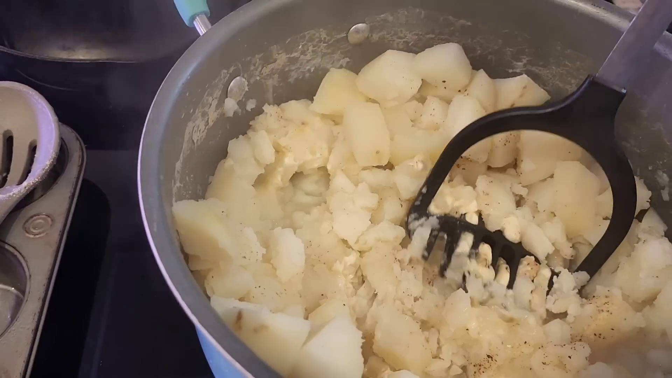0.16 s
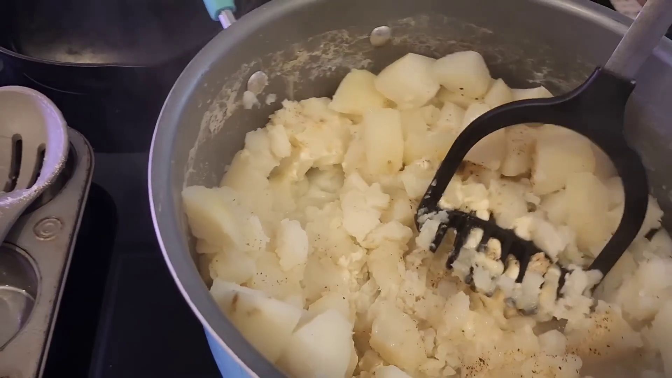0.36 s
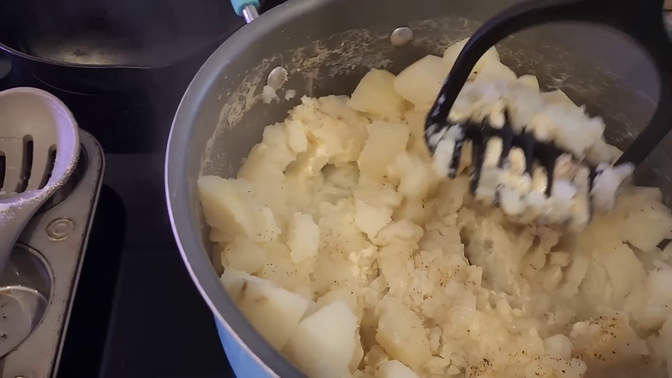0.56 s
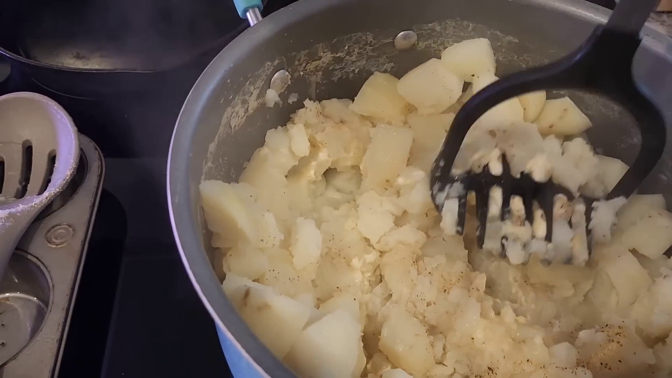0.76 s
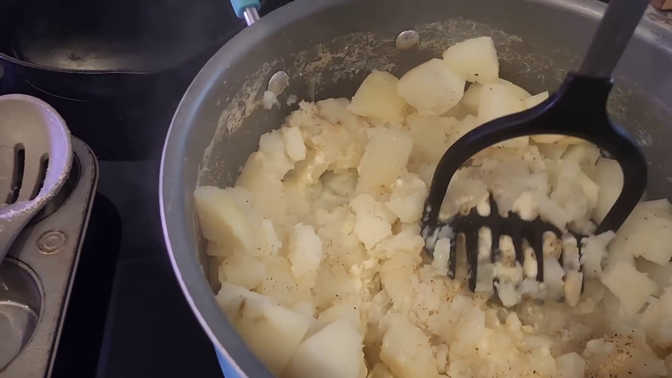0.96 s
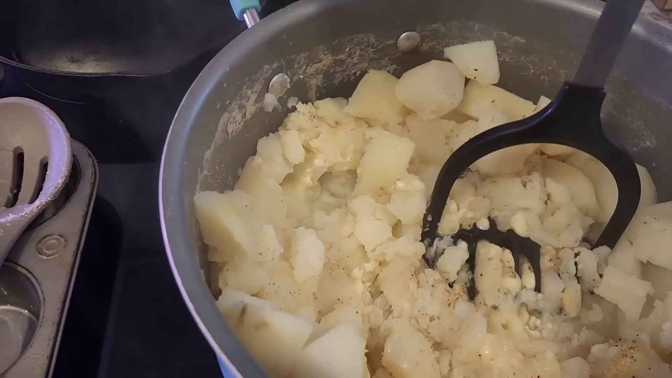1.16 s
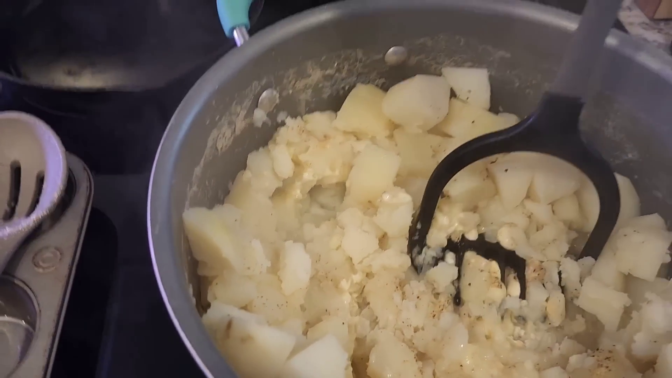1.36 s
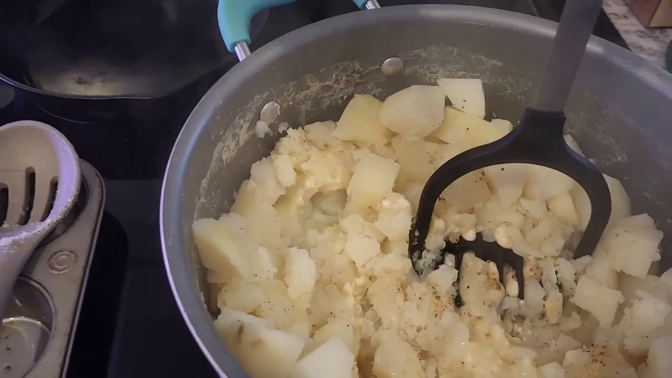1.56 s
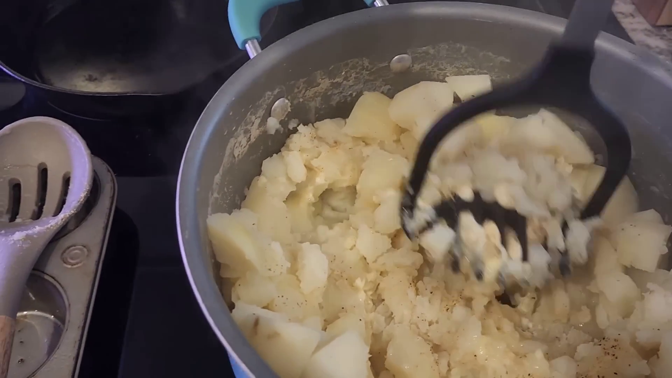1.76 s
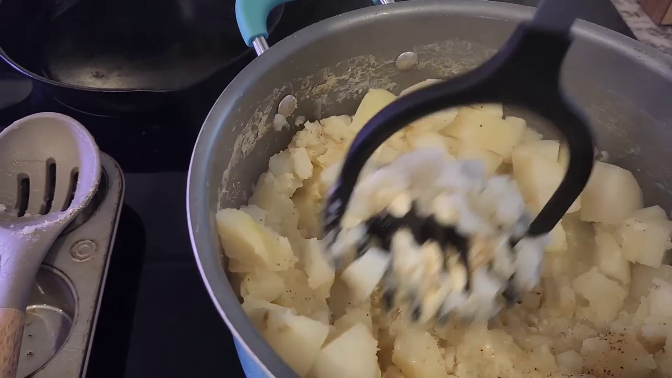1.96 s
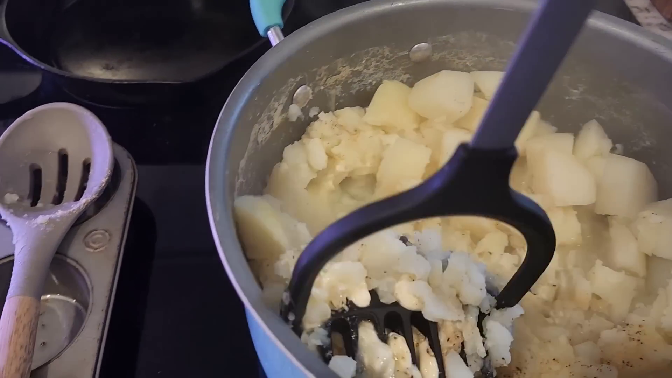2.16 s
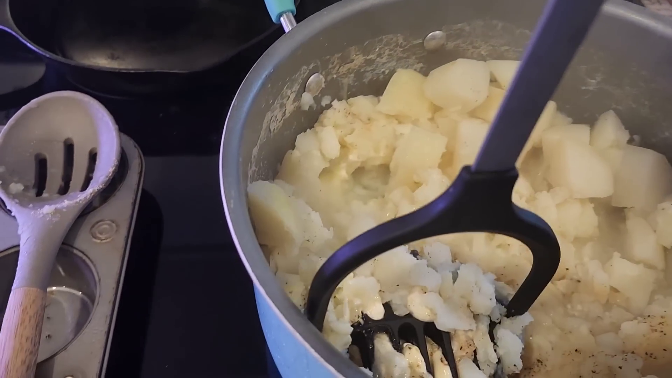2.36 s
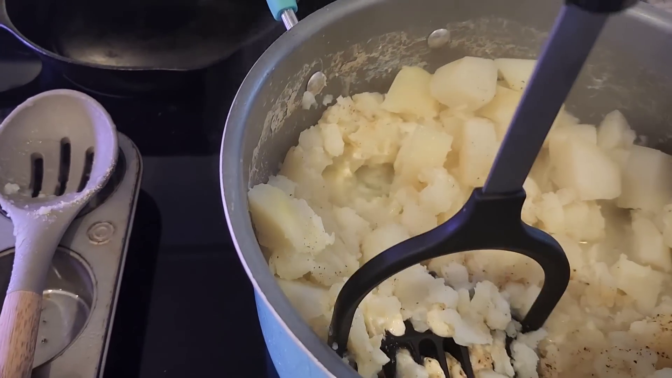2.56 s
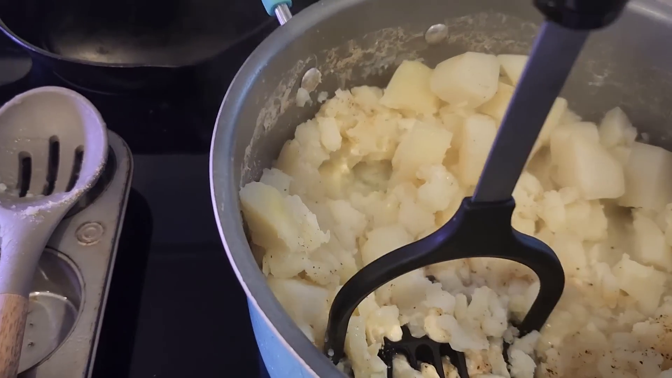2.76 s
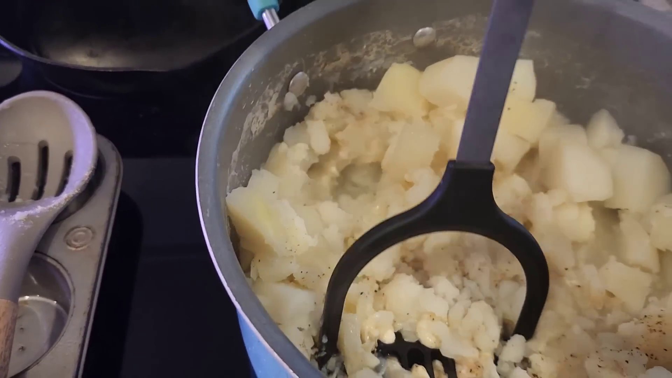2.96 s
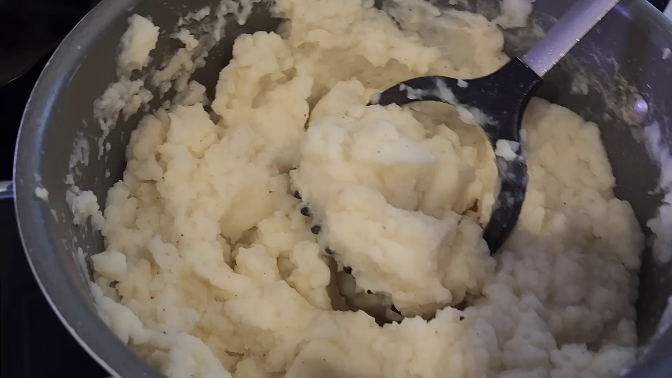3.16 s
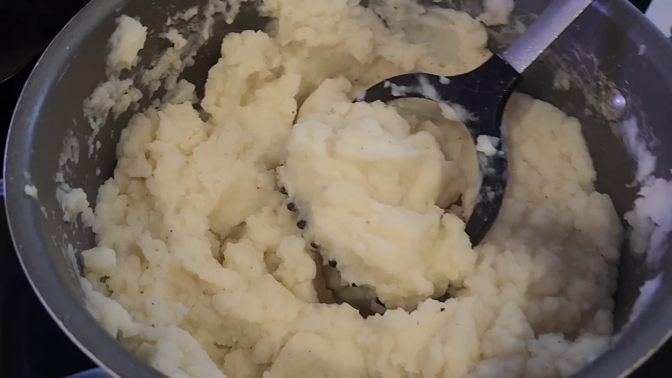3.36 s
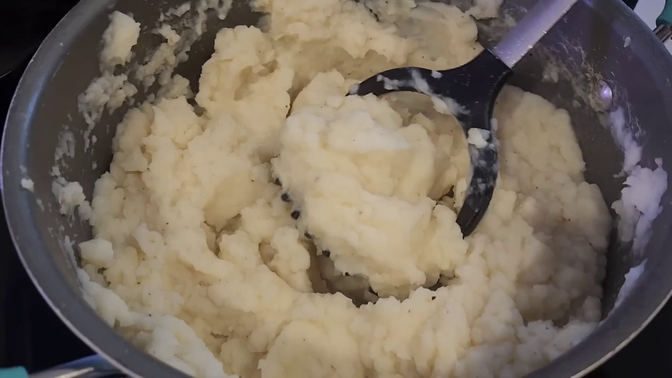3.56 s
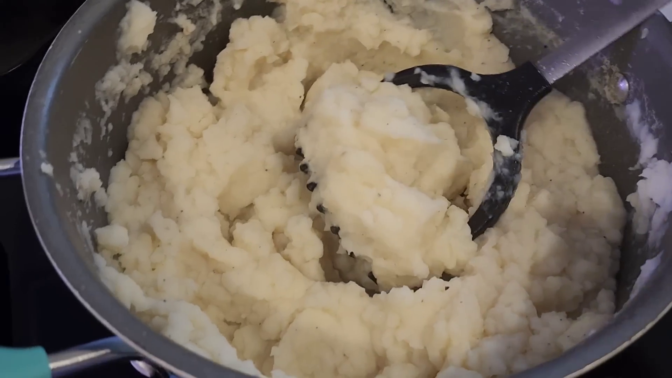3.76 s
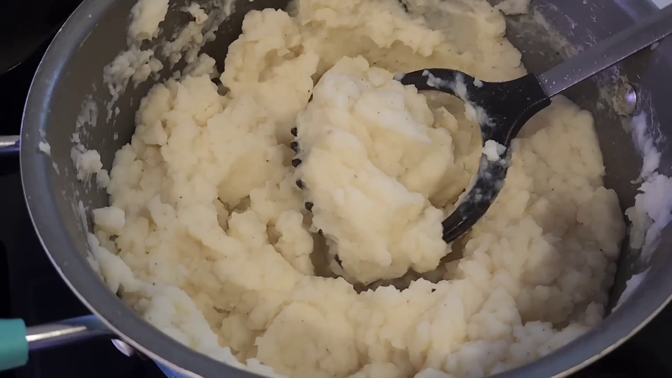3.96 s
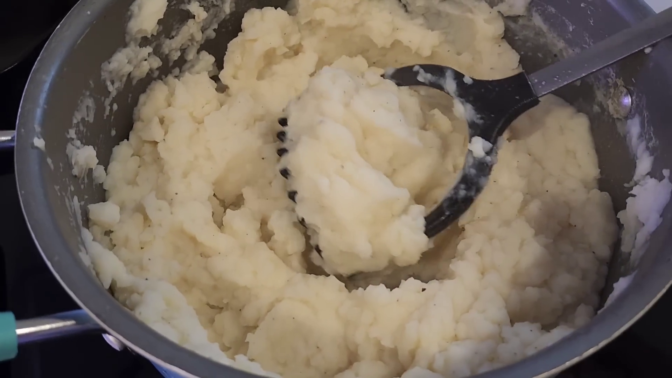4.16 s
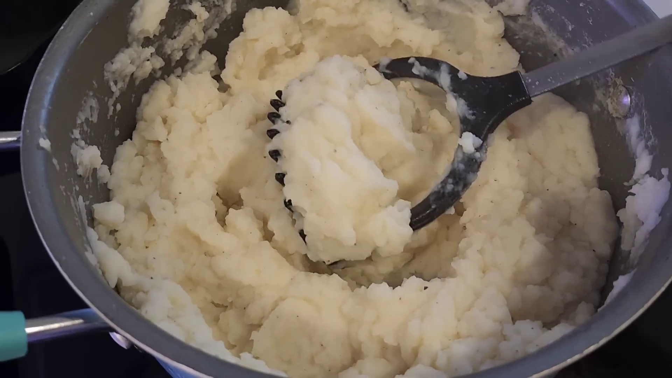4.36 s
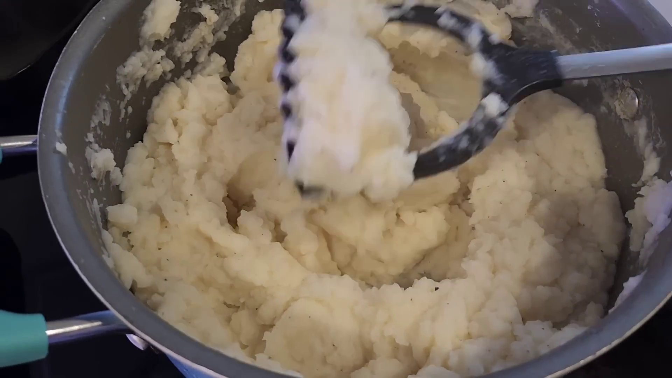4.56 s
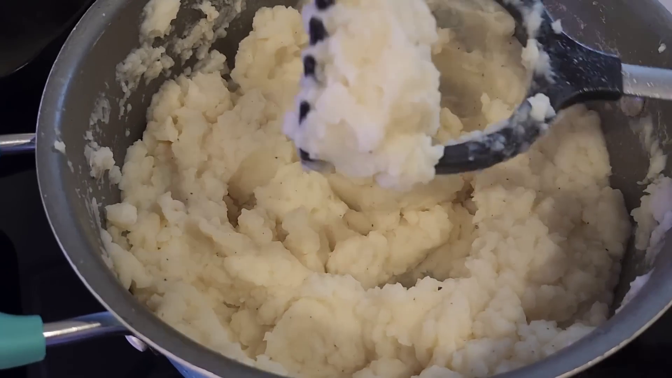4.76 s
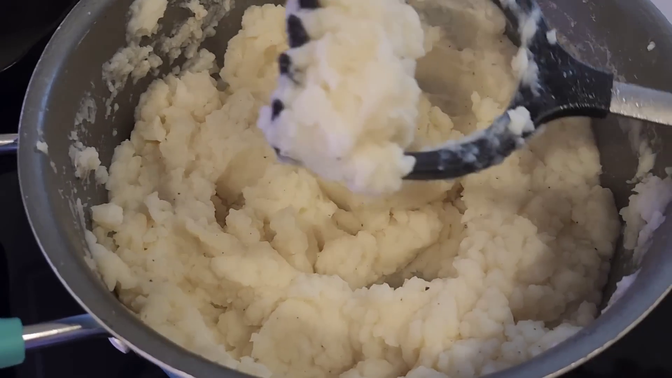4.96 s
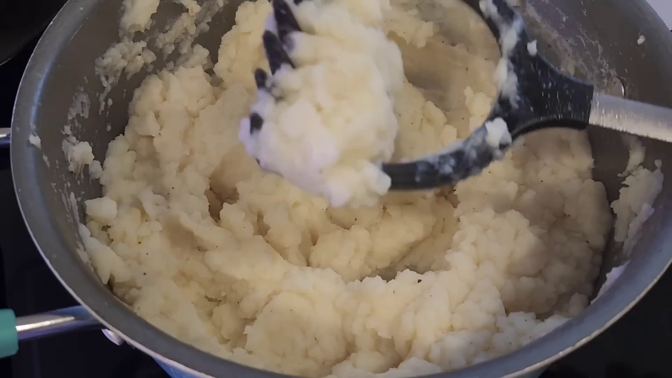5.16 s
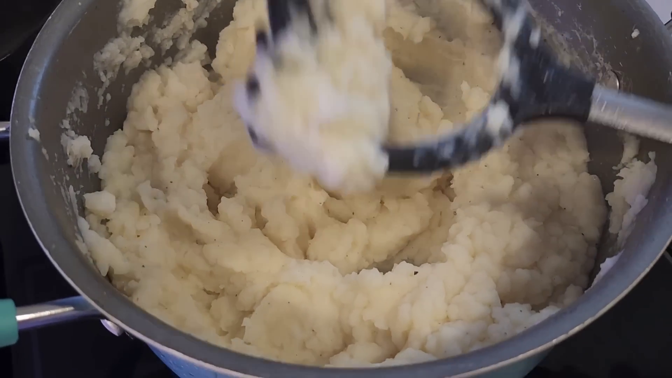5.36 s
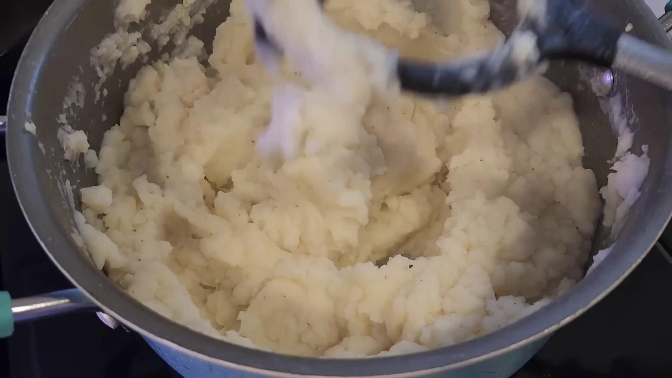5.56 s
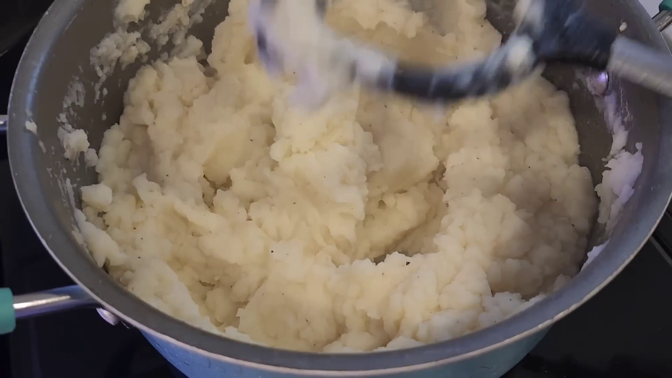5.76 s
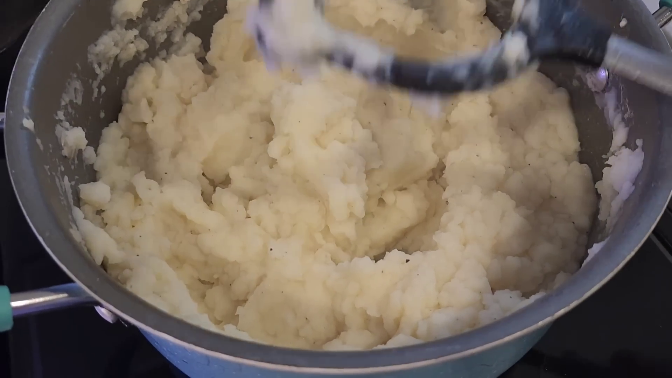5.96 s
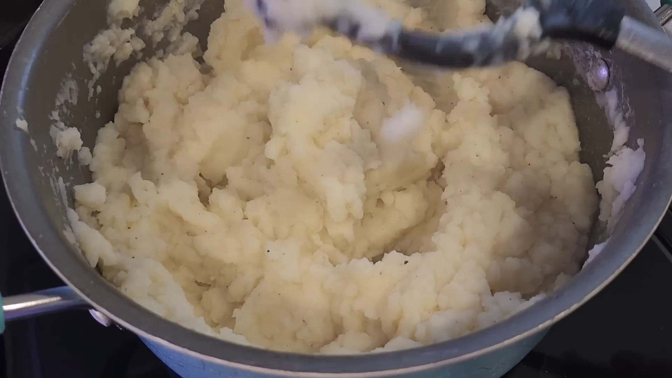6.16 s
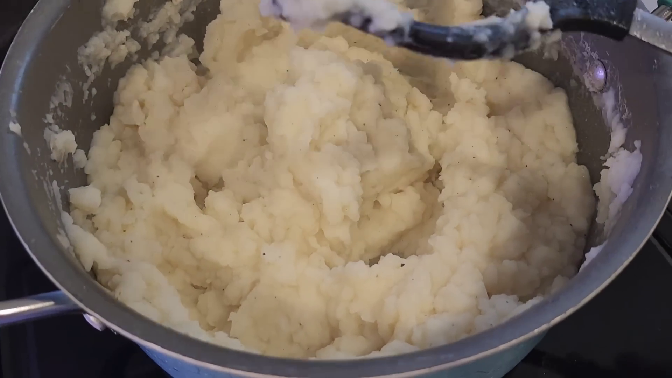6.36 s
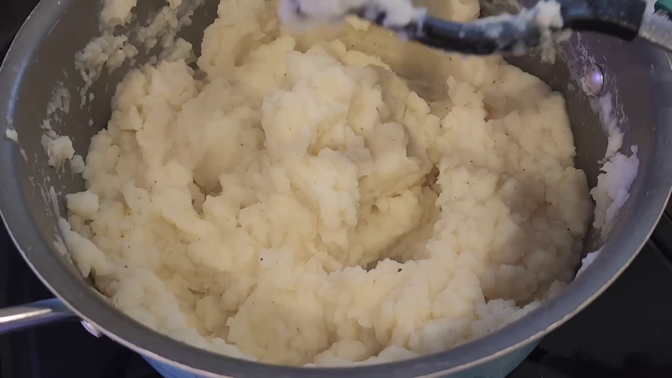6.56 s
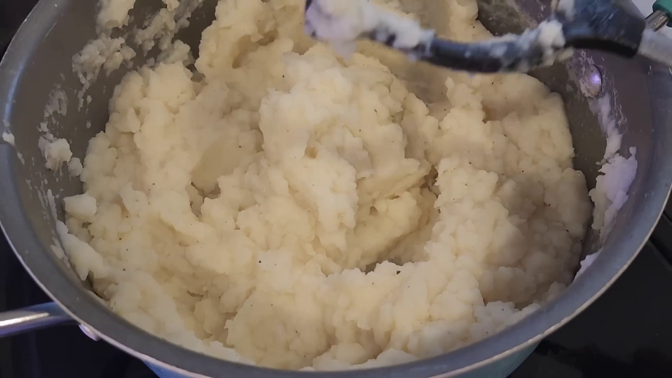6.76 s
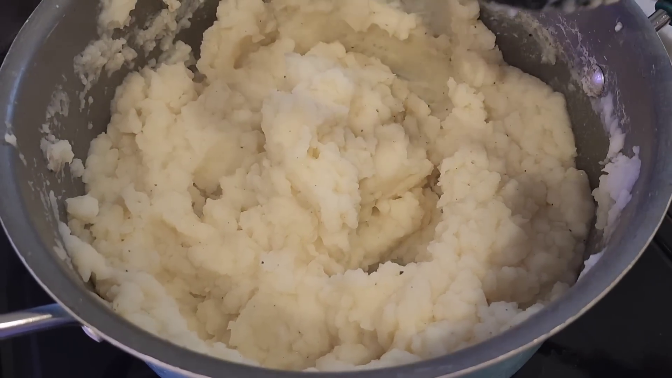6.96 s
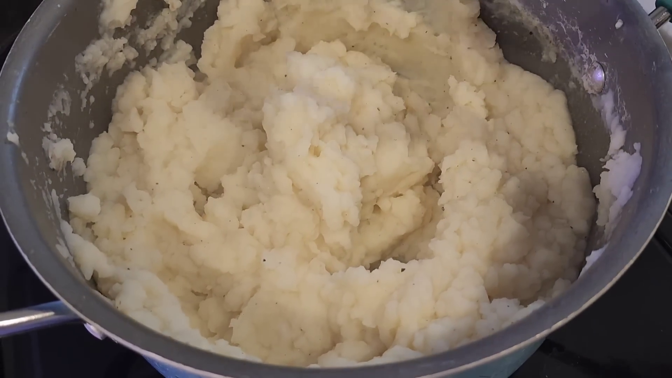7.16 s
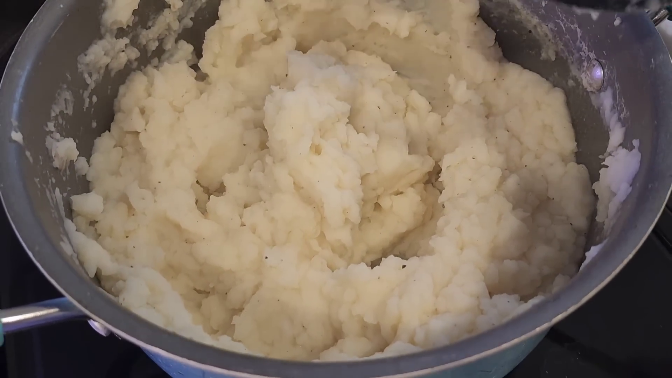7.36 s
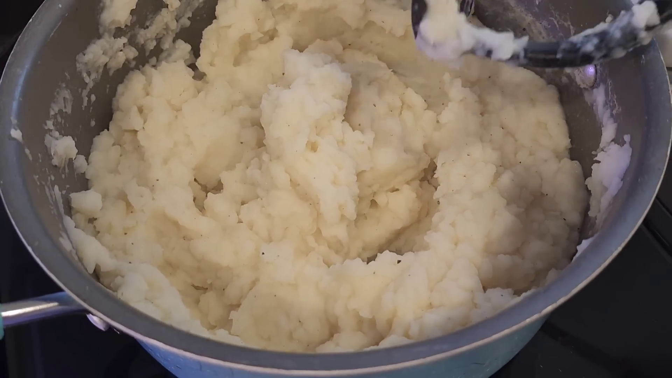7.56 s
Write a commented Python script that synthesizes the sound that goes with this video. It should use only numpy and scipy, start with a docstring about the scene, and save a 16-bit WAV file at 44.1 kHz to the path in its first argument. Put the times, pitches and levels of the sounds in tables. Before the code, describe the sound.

Soft squelching and popping of potato mash, a brief cut, one metallic clink, then a run of dull clanking taps in a humming kitchen.

```python
"""Small kitchen, two-microphone handheld recorder just above a metal saucepan, an appliance humming throughout.
First boiled potatoes are mashed: ringing air pockets crackle and pop, noise bursts smack, a cavity is sucked open.
After an edit and a short silence the wet crackle returns and the masher's steel shaft clinks on the rim amid it.
Last, nine knocks clean the masher: decaying modes of the full pan, noise cracks and the room's reply.
Under it all lies the hum, shaped noise with drones and a mains tone, and now and then a soft sine hoot."""
import sys
import numpy as np
from scipy import signal
from scipy.fft import next_fast_len
from scipy.io import wavfile

SR = 44100
rng = np.random.default_rng(int(sys.argv[2]) if len(sys.argv) > 2 else 0)


def invert_db(level):
    """Linear amplitude ratio for a level in decibels (20 dB per decade), elementwise."""
    return 10 ** (np.asarray(level, dtype=float) / 20)


def wav_record(signal):
    """Record a signal, one row per channel, as 16-bit PCM in the file named by sys.argv[1]."""
    frames = np.transpose(np.atleast_2d(signal))
    bounded = np.clip(frames, -1, 1)
    # unit amplitude maps onto the largest positive 16-bit level
    quanta = np.round(bounded * 32767).astype(np.int16)
    wavfile.write(sys.argv[1], SR, quanta)


N = 336042

# steady seething of the worked mash, one curve each side of the edit: t/s, squelch level/dB, crackle level/dB
SEETHE = [
    [(0.0, -78, -61.5), (0.3, -62, -61), (0.5, -62.5, -66), (0.66, -58, -64), (0.74, -62, -73),
     (0.9, -67, -65.5), (0.98, -64, -62.5), (1.12, -57.5, -66), (1.3, -61.5, -57.5), (1.6, -59.5, -63.5),
     (1.9, -61.5, -61), (2.1, -60, -78), (2.4, -62, -73), (2.7, -60, -61), (3.05, -62.5, -62)],
    [(3.69, -84, -99), (3.8, -85, -55.5), (3.95, -70, -66), (4.1, -70, -70), (4.3, -68, -67),
     (4.5, -71, -65), (4.6, -76, -67), (4.76, -90, -80), (4.85, -94, -95)],
]
# squishes as the masher presses a lump flat: t/s, hold/s, squelch level/dB, crackle level/dB
SQUISHES = [(0.0, 0.026, -59.5, -73), (0.142, 0.086, -79, -50.5), (0.404, 0.046, -63, -60.5),
            (0.613, 0.044, -66, -54.5), (0.79, 0.0059, -59, -62), (1.009, 0.032, -57, -58),
            (1.156, 0.044, -58, -54), (1.235, 0.033, -51.5, -81), (1.37, 0.093, -56, -50.5),
            (1.65, 0.06, -65, -64), (1.831, 0.094, -60, -56), (1.906, 0.0067, -44, -45.5),
            (1.914, 0.013, -69, -50), (1.984, 0.016, -53, -56), (2.202, 0.018, -53.5, -79),
            (2.381, 0.0083, -67, -57), (2.528, 0.011, -59, -58), (2.754, 0.07, -62, -54.5),
            (3.006, 0.074, -76.5, -55.5), (3.759, 0.012, -71, -62.5), (3.995, 0.019, -70, -59),
            (4.476, 0.09, -82, -54)]
SQUISH_RISE_S, SQUISH_T60_S = 0.0061, 0.13
# single pops of air in the mash: t/s, splash level/dB, splash f/Hz, ring f/Hz, ring level/dB
POPS = [(0.059, -42, 7250, 3300, -41), (0.116, -41, 8550, 1190, -61), (0.1465, -41, 6300, 1640, -65),
        (0.17, -34, 9600, 1190, -57), (0.205, -52, 6600, 3180, -44), (0.2237, -46, 6330, 1210, -45),
        (0.24, -34, 10520, 2820, -34), (0.265, -43, 6000, 1300, -62), (0.271, -40, 13000, 1300, -63),
        (0.356, -44, 7500, 2200, -49), (0.47, -47, 10000, 1300, -56), (0.509, -50, 7000, 3330, -45),
        (0.685, -47, 8000, 1300, -60), (0.283, -57, 5660, 1230, -37.5), (0.408, -37.5, 6100, 1620, -43),
        (0.4372, -64, 5350, 1610, -35.5), (0.5447, -44, 7270, 2050, -43), (0.586, -45, 11300, 1300, -45),
        (0.62, -41, 11840, 3240, -39), (0.6416, -38, 12700, 2500, -39), (0.662, -44, 7310, 1160, -38),
        (0.7076, -43, 8000, 1220, -44), (0.796, -43, 8200, 2320, -46), (0.814, -55, 7060, 1170, -43),
        (0.955, -49.5, 5540, 2400, -35.5), (1.02, -39.5, 10300, 1700, -47), (1.168, -42.5, 8520, 1820, -50),
        (1.1874, -35, 6440, 1420, -53), (1.2246, -59, 5650, 1460, -41), (1.266, -44, 9360, 3210, -32.5),
        (1.3544, -44, 5210, 1980, -48), (1.398, -38, 7600, 1220, -41), (1.4266, -45, 7260, 3320, -32.5),
        (1.532, -63, 7800, 1330, -46), (1.6812, -49, 6530, 1930, -42), (1.762, -63, 5620, 1310, -48),
        (1.8393, -44.5, 6670, 2080, -56), (1.8801, -49, 6240, 1400, -59), (1.9984, -59, 5490, 1410, -52),
        (2.082, -42.5, 7600, 1600, -64), (2.184, -69, 5610, 2300, -41), (2.225, -49, 10160, 2620, -50),
        (2.244, -41, 4700, 2070, -54), (2.5478, -54, 8910, 2950, -37), (2.757, -37, 12450, 1350, -63),
        (2.998, -39.5, 7790, 1350, -62), (3.704, -28, 4800, 2475, -38), (3.7188, -37, 6050, 1250, -69),
        (3.7597, -30.5, 5000, 2270, -41), (3.9696, -38.5, 9900, 1190, -61), (4.043, -44.5, 5400, 1430, -45),
        (4.0713, -41, 10400, 1250, -53), (4.1033, -50, 10200, 1750, -64), (4.1655, -41, 7250, 1180, -58),
        (4.204, -38.5, 5000, 1350, -47), (4.239, -50, 10400, 2480, -45), (4.2457, -34.5, 4850, 1330, -40.5),
        (4.2626, -37, 10100, 1430, -58), (4.302, -35, 4830, 1480, -62), (4.339, -36, 8800, 1200, -67),
        (4.43, -49, 5200, 3780, -33.5), (4.452, -42, 5370, 2480, -50), (4.493, -40, 11600, 2300, -64),
        (4.502, -39, 5300, 1390, -61), (4.5218, -36, 6400, 1470, -60), (4.543, -40, 8730, 1340, -48),
        (4.55, -38, 5200, 1420, -64), (4.5782, -40, 7850, 2470, -62), (4.624, -37.5, 7850, 1350, -61),
        (4.65, -50, 11400, 1300, -62), (4.731, -55, 10600, 1310, -62), (4.736, -61, 9700, 1300, -62),
        (5.2593, -32.5, 7700, 1410, -41), (5.32, -43, 7060, 1270, -50), (5.495, -36, 11900, 1560, -53),
        (5.562, -40, 8000, 1330, -57), (5.9282, -48, 6610, 1610, -47)]
POP_PAN_DB, POP_PAN_SCATTER_DB = 5.5, 0.5   # pops lie left of centre
# wet smacks, each a broad burst: t/s, level/dB, f/Hz
SMACKS = [(0.6449, -43, 1360), (0.6597, -34.5, 1400), (0.8023, -42.5, 2300), (1.0274, -46, 1800),
          (1.1804, -41, 1400), (1.2231, -40, 1430), (1.266, -50, 3150), (1.3553, -43.5, 2000),
          (1.3997, -40, 3270), (1.4144, -45, 1300), (1.4894, -48, 3200), (1.5334, -40, 1360),
          (1.6814, -46.5, 1930), (1.761, -41.5, 1340), (1.8387, -42, 2110), (1.9984, -44, 1400),
          (2.0274, -46, 1600), (2.0627, -48, 1630), (2.127, -51, 2320), (2.183, -56, 2310),
          (2.2428, -43.5, 2100), (2.4162, -43, 1380), (2.5481, -44, 2900), (2.6904, -45, 1910),
          (2.7856, -44.5, 2370), (2.845, -43, 2060), (4.2038, -51, 1340), (4.369, -40.5, 3660)]
SMACK_T60_S, SMACK_SPREAD = 0.017, 1.68   # spread: ratio of band edge to centre
# the masher sucks free of the mash: t/s, strength/dB
SUCTIONS = [(1.9232, -13.5)]
# the cavity it leaves: f/Hz, level/dB, t60/s, starting phase/rad
CAVITY_MODES = [(644, -5, 0.011, 7.5), (1250, 2.5, 0.0056, 2.4), (2300, -40, 0.0071, -7.5),
                (7060, -23.5, .005, 9), (10250, -3, .005, 9.5)]
# masher on the pan: t/s, strength/dB, then relative thud/dB, sharpness/dB, clank/dB, boom/dB,
# and lead of the lower clank modes over the upper/dB
TAPS = [(4.92, -23.5, -8.5, -6.5, 1.5, -9, 3), (5.2, -22, -5, -7.5, 1, -11.5, 7),
        (5.457, -21, -4, -4, 1.5, -9, 3), (5.691, -21.5, -5.5, -6.5, -1, -6.5, 6),
        (5.883, -20, -4.5, -7.5, 4.5, -9, -2), (6.071, -21, -5, -4, 3, -9, 1.5),
        (6.286, -21, -4, -4.5, 3, -3.5, 0.5), (6.521, -22.5, -2.5, -3, -4.5, -3.5, 1.5),
        (6.745, -22, -1.5, -5, -2, -9, -2.5)]
# soft shoves of the pan on the hob: t/s, strength/dB
SHOVES = [(0.578, -28.5), (1.029, -39), (1.4, -64), (1.721, -30.5), (2.288, -39), (4.018, -58.5)]
# modes of the pan full of mash: f/Hz, level/dB, t60/s, left-right/dB, left lead/rad
PAN_MODES = [(84, -12, 0.48, -4, 0.5), (103, -9, 0.02, 10, 6.5), (154.6, 2, 0.14, 0.5, 0),
             (182, -2.5, 0.097, -1.5, -0.2), (257.5, -7, 0.28, 3, -0.5), (316.4, 3.5, 0.085, -2.5, -1.5),
             (425, -17, 0.07, -8, 1.5), (484, -0.5, 0.016, -5, -0.77), (568, -4, 0.016, 11, 0.4),
             (777, -12.5, 0.029, 11, 2.5), (1270, -1.5, 0.0066, -2, 2), (1410, -18.5, 0.05, -11, -10.5),
             (1430, -6.5, 0.025, -14.5, -2), (1510, -10.5, 0.036, -13.5, 9), (1610, -9, 0.049, -12, 4),
             (2050, -17.5, 0.016, -21, 1.5), (2290, -31.5, 0.025, -9, 0.8), (2950, -3.5, 0.0029, 13.5, 2),
             (2400, -20, 0.016, -8, 2.5), (6530, -8, 0.017, 3, 2), (7160, -8, 0.018, 1, 3),
             (7830, -1.5, 0.0049, 19.5, 5)]
# the shaft clinks on the rim, a single row: t/s, ring strength/dB, crack level/dB
CLINK = (3.806, -15, -24)
# modes of the masher's steel shaft: f/Hz, level/dB, t60/s
SHAFT_MODES = [(163, -24, 0.183), (448, -20, 0.056), (515, -25, .03), (578, -10.5, 0.046),
               (660, -16, 0.031), (1170, -19.5, 0.037), (1300, -17.5, 0.022), (1340, -12.5, 0.022),
               (1620, -17, 0.042), (2320, -9, 0.019), (2860, -16, 0.038), (3870, -22, 0.027),
               (4180, -17.5, 0.032), (4370, -5.5, .03), (6440, -3, 0.03), (6550, -13, 0.03),
               (6555, -24, 0.23)]
# crack of the masher's edge on the rim: f/Hz, relative level per Hz/dB, left-right/dB
CRACK_SPECTRUM = [(1547, 6, 9), (2390, -3.5, 10.5), (3500, -7.5, -10), (4370, -5.5, -13),
                  (5300, -11.5, 14.5), (6400, -4.5, 21.5), (7600, -0.5, 1), (8900, 1, 4), (10200, -2, -0.5),
                  (13200, -8, -6), (15500, 4, 10)]
# how far the left microphone leads in the crack: f/Hz, left lead/rad
CRACK_LEAD = [(0, 0), (1460, -2), (1810, -2.5), (2840, 5.5), (4130, -6), (6630, 6), (7750, -2), (10100, -2),
              (11200, -1.8), (12100, -2.4), (12800, 1.5), (16600, -26.5)]
# treble of the room's answer to a knock: f/Hz, relative level per Hz/dB, t60/s
AFTERSOUND = [(1400, -9, 0.8), (2400, -8, 0.2), (3980, -9, 0.42), (5300, -21.5, 0.33), (7000, -12.5, 0.4),
              (9000, -18, 0.32), (12000, -21.5, 0.27), (15700, -29, .2)]
# reverberation of the kitchen: f/Hz, t60/s, level/dB
KITCHEN = [(60, 0.79, -6.5), (250, 0.16, -1), (1000, 0.34, -11.5), (3500, 0.25, -9), (5500, 0.25, -16),
           (8000, 0.27, -6), (15830, 0.25, -12.5)]
# likeness of the two microphones in diffuse sound: f/Hz, likeness (-1 to 1)
LIKENESS = [(60, 1), (180, 0.91), (550, 0.27), (1650, -0.26), (4970, 0.89), (15000, -0.43)]
# balance of the two microphones: f/Hz, left-right/dB
BALANCE_DB = [(60, 3), (180, -0.5), (550, 0), (1650, 0.5), (4970, 3), (15000, 9)]
# spectrum of the hum and air of the kitchen: f/Hz, relative level per Hz/dB
AIR_SPECTRUM = [(15, -38), (25, -30), (69, -18.5), (91, -11), (113, -9.5), (313, -13.5), (552, -20),
                (631, -18.5), (1080, -35.5), (1340, -21), (1750, -37.5), (2010, -31.5), (3200, -38),
                (5000, -45), (6350, -45), (8040, -43.5), (10200, -60), (13000, -59), (16300, -57.5)]
AIR_DB = -50.5
# rough drones in the hum: f/Hz, width/Hz, level/dB
DRONES = [(61.5, 35.3, -52.5), (119.3, 19, -55), (250, 40, -63.5), (318.7, 26, -57.5), (400, 46, -62)]
MAINS_HZ, MAINS_DB = 121.5, -54.5
# course of the hum, one curve each side of the edit: t/s, relative level/dB
SWELL = [
    [(0.0, 0), (3.05, -0.5)],
    [(3.2, 0), (7.62, 0.5)],
]
# short low hoots that swell out of the hum: t/s, length/s, f/Hz, peak level/dB
HOOTS = [(0.417, 0.1, 260, -45.5), (1.342, 0.087, 393.5, -42), (1.386, 0.078, 250, -48),
         (2.261, 0.077, 250, -45.5), (3.985, 0.067, 401, -43.5), (3.99, 0.07, 259, -43),
         (6.776, 0.1, 400, -40.5)]
EDIT_OUT_S, EDIT_IN_S, FADE_IN_S = 3.048, 3.195, 0.019
EDGES_HZ = 25 * 2 ** np.arange(0, 9.6, .34)   # bands for the hum and the reverberation


def rms_one(x):
    """Scale to unit rms."""
    return x / np.sqrt(np.mean(x ** 2) + 1e-20)


def in_time(tables, column, outside):
    """One column of several curves over time, with a resting value between them."""
    t, out = np.arange(N) / SR, np.full(N, float(outside))
    for rows in map(np.array, tables):
        inside = (t >= rows[0, 0]) & (t <= rows[-1, 0])
        out[inside] = np.interp(t[inside], rows[:, 0], rows[:, column])
    return out


def at_hz(points, hz, column=1):
    """Read a spectrum on a log-frequency axis."""
    points = np.array(points)
    return np.interp(np.log(hz), np.log(points[:, 0]), points[:, column])


def bands(edges):
    """Neighbouring bands, dealt in turn to two noises: noise index, low edge, high edge, centre in Hz."""
    return [(k % 2, low, high, np.sqrt(low * high)) for k, (low, high) in enumerate(zip(edges, edges[1:]))]


def sides(pan_db):
    """Left and right gains of a left-right difference in dB."""
    return invert_db(np.multiply.outer([.5, -.5], pan_db))


def drift(rate):
    """Slow random wandering of unit rms: two-pole low-passed noise, drawn every 40 samples."""
    pole = np.exp(-80 * np.pi * rate / SR)
    white = rng.standard_normal(N // 40 + 2002)
    slow = signal.lfilter([1], [1, -2 * pole, pole * pole], white)[2000:]   # drop the filter's start
    return np.interp(np.arange(N) / 40, np.arange(len(slow)), rms_one(slow))


def ring(x, hz, t60, phase=0.):
    """Two-pole resonance: a unit click sets a decaying sine of height 1 ringing."""
    r, w = invert_db(-60 / (t60 * SR)), 2 * np.pi * hz / SR
    return signal.lfilter([np.sin(phase), r * np.sin(w - phase)], [1, -2 * r * np.cos(w), r * r], x + 1e-18)


def ring_pair(force, hz, t60, lead):
    """One mode at both microphones, the left ahead in phase by lead (rad)."""
    return np.array([ring(force, hz, t60, lead / 2), ring(force, hz, t60, -lead / 2)])


def band(x, low_hz, high_hz):
    """Butterworth band-pass."""
    return signal.sosfilt(signal.butter(2, [low_hz, high_hz], "band", fs=SR, output="sos"), x)


def diffuse(white, hz):
    """Mid and side noise to a left-right pair, as alike as the room makes it at this pitch."""
    alike = np.clip(at_hz(LIKENESS, hz), -1, 1)
    mid, side = np.sqrt(1 + alike) * white[0], np.sqrt(1 - alike) * white[1]
    pair = mid + side * [[1], [-1]]
    return pair * sides(at_hz(BALANCE_DB, hz))[:, None] / np.sqrt(2)


def blows(rows, length_s, rattle):
    """Force of each blow: a smooth push away from the microphones, broken up by rattle."""
    size = max(round(length_s * SR), 3)
    out, grit = np.zeros(N), rng.standard_normal((len(rows), 400))
    for (s, db), noise in zip(rows, grit):
        push = np.hanning(size + 2)[1:-1] * (rattle * noise[:size] - 1)
        i = round(s * SR)
        out[i:i + size] += invert_db(db) * push / np.sqrt(size)
    return out


def mash_level(column):
    """Level in dB of the steady seething plus every squish: quick rise, hold, dying away."""
    age, power = np.arange(SR // 3) / SR, invert_db(2 * in_time(SEETHE, column=column, outside=-120))
    for row in SQUISHES:
        start_s, hold_s, level_db = row[0], row[1], row[column + 1]
        fall_db = -60 * np.clip(age - SQUISH_RISE_S - hold_s, 0, None) / SQUISH_T60_S
        rise = np.clip(age / SQUISH_RISE_S, 0, 1) ** 2
        i = round(max(start_s, 0) * SR)
        power[i:i + len(age)] += invert_db(2 * (level_db + fall_db)) * rise
    return 10 * np.log10(power)


def grains(level_db, typical_per_s, low_hz, high_hz, cycles, spread_db):
    """Tiny air pockets burst at random, in clumps, each ringing briefly; each pitch has its own lag."""
    sizes = invert_db(spread_db * np.minimum(rng.exponential(1, N), 4)) * rng.choice([-1, 1], N)
    born = rng.random(N) < typical_per_s * invert_db(7.0 * drift(15)) / SR
    dealt, out = rng.integers(0, 12, N), np.zeros((2, N))
    for k, hz in enumerate(np.geomspace(low_hz, high_hz, 12)):
        soft_onset = ring(sizes * born * (dealt == k), hz, 1.2 / hz)
        pocket = ring(soft_onset, hz, cycles / hz) * hz
        lagged = np.roll(pocket, rng.integers(-9, 10))
        out += np.array([pocket, lagged]) * sides(at_hz(BALANCE_DB, hz))[:, None]
    return invert_db(level_db) * rms_one(out)


def pops(cycles, rise_s, splash_s, spread):
    """Each pop of air is a short ring at its pitch plus a wet splash of noise around a higher one."""
    out, t = np.zeros((2, N)), np.arange(512) / SR
    noise, place = rng.standard_normal((len(POPS), 2, 512)), rng.uniform(-1.0, 1, (len(POPS), 2))
    for (s, splash_db, splash_hz, hz, db), splash, (side, lag) in zip(POPS, noise, place):
        ear_t = t + [[0], [0.00028 * lag - .00015]]   # the right side is shifted in phase
        tone = invert_db(db) * np.sin(2 * np.pi * hz * ear_t) * invert_db(-60 * t * hz / cycles)
        hiss = rms_one(band(splash, splash_hz / spread, min(splash_hz * spread, 16500)))
        wet = invert_db(splash_db) * hiss * invert_db(-60 * t / splash_s)
        i, pan_db = round(s * SR), POP_PAN_DB + POP_PAN_SCATTER_DB * side
        out[:, i:i + 512] += sides(pan_db)[:, None] * (tone + wet) * np.clip(t / rise_s, 0, 1)
    return out


def smacks():
    """Wet mash parting: a short decaying burst of noise over more than an octave."""
    out, t = np.zeros((2, N)), np.arange(1024) / SR
    for (s, db, hz), noise in zip(SMACKS, rng.standard_normal((len(SMACKS), 1024))):
        hiss = rms_one(band(noise, hz / SMACK_SPREAD, hz * SMACK_SPREAD))
        burst = hiss * np.clip(t / 0.0017, 0, 1) * invert_db(db - 60 * t / SMACK_T60_S)
        i = round(s * SR)
        out[:, i:i + 1024] += sides(2.5)[:, None] * burst
    return out


def suction():
    """One soft pulse rings the modes of the closing cavity for a few cycles."""
    force = invert_db(-3.0) * blows(SUCTIONS, 0.00046, rattle=0.)
    return sum(invert_db(level_db) * ring(force, hz, t60, phase) for hz, level_db, t60, phase in CAVITY_MODES)


def pan(scatter_db, boom_hz, thud_hz, clank_hz, lean_hz, sharp_hz):
    """Blows ring the pan's modes: thud and shoves the low, taps and shoves the middle, the sharp edge the high."""
    s, db, thud_db, sharp_db, clank_db, boom_db, lean_db = np.transpose(TAPS)
    shove, out = blows(SHOVES, 0.0016, rattle=0.38) * invert_db(-22.0), np.zeros((2, N))
    s = s + .0008   # the full weight lands just after the first touch
    for hz, level_db, t60, pan_db, lead in PAN_MODES:
        strength = db + scatter_db * rng.standard_normal(len(s))
        if hz < thud_hz:
            strength = strength + (boom_db if hz < boom_hz else thud_db)
            force = invert_db(-8.5) * blows(np.c_[s, strength], 0.00018, rattle=0.56) + shove
        elif hz < sharp_hz:
            if hz > clank_hz:   # the wall clanks as the point of contact shifts
                strength = strength + clank_db + lean_db * (hz < lean_hz)
            force = invert_db(-2.0) * blows(np.c_[s, strength], 0.00027, rattle=0.051) + invert_db(1.5) * shove
        else:
            strength = strength - clank_db * (hz > 7000)   # where the wall clanks less, the rim pings more
            force = invert_db(10.5) * blows(np.c_[s, strength + sharp_db], .0001, rattle=0.13)
        out += invert_db(level_db) * sides(pan_db)[:, None] * ring_pair(force, hz, t60, lead)
    return out


def shaft():
    """One short hard blow rings the shaft's modes, each with its own place between the microphones."""
    s, ring_db, _ = CLINK
    force = blows([(s + .0006, ring_db)], .0001, rattle=0.)
    place = rng.uniform(-0.25, 1, len(SHAFT_MODES))
    first = round(s * SR)
    force, rung = force[first:first + SR // 2], 0
    for (hz, db, t60), side in zip(SHAFT_MODES, place):
        pair = ring_pair(force, hz, t60, 2 * side * hz / 3000)
        rung = rung + invert_db(db) * sides(1.6 + 3 * side)[:, None] * pair
    return np.pad(rung, ((0, 0), (first, N - first - len(force))))


def crack(rise_s, snap_s, jangle_s, jangle_db, room_db, build_s, alike):
    """Broad noise on clink and taps, then a loose jangle of handle and rim; the walls answer with dying noise."""
    clink_s, _, clink_db = CLINK
    first = round(clink_s * SR) - 64
    size, t = N - first, np.arange(SR // 8) / SR
    shape, struck = np.full(size, 1e-9), np.full(size, 1e-18)
    snap, jangle = invert_db(-60 * t / snap_s), invert_db(jangle_db - 60 * t / jangle_s)
    burst = np.clip(t / rise_s, 0, 1) ** 2 * (snap + jangle)
    for s, level_db in [(row[0], row[1] + row[3]) for row in TAPS] + [(clink_s, clink_db)]:
        i = round(s * SR) - first
        shape[i:i + len(t)] += invert_db(level_db + 17.5) * burst
        struck[i] = invert_db(2 * (level_db + room_db))   # power thrown at the walls
    build = np.exp(-1 / (build_s * SR))
    struck = signal.lfilter([1 - build], [1, -build], struck)
    walls = rng.standard_normal((2, 2, size))
    own, shared = rng.standard_normal((2, 2, size)) * shape, rng.standard_normal((2, size)) * shape
    # the analytic signal lets the shared part be turned in phase
    turned, out = signal.hilbert(shared, next_fast_len(size))[:, :size], 0
    for k, low, high, hz in bands(1200 * 2 ** np.arange(0, 4, 1 / 3)):
        lead = np.exp(.5j * at_hz(CRACK_LEAD, hz) * np.array([[1], [-1]]))
        pair = np.sqrt(alike) * (turned[k] * lead).real + np.sqrt(1 - alike) * own[k]
        gain = invert_db(at_hz(CRACK_SPECTRUM, hz)) * sides(at_hz(CRACK_SPECTRUM, hz, column=2))[:, None]
        out = out + gain * band(pair, low, high)
        fade = invert_db(-2 * 60 / (at_hz(AFTERSOUND, hz, column=2) * SR))
        power = signal.lfilter([1], [1, -fade], struck)
        answer = np.sqrt(power) * diffuse(band(walls[k], low, high), hz)
        out = out + invert_db(at_hz(AFTERSOUND, hz)) * answer
    return np.pad(out, ((0, 0), (first, 0)))


def kitchen(x):
    """Reverberation: noise that builds up within 2 ms and dies away band by band."""
    t, tail = np.arange(SR // 2) / SR, 0
    white = rng.standard_normal((2, 2, len(t)))
    for k, low, high, hz in bands(EDGES_HZ):
        t60 = at_hz(KITCHEN, hz)
        even_energy = np.sqrt(2 * np.log(1000) / (t60 * SR))   # the level does not depend on t60
        decay = invert_db(at_hz(KITCHEN, hz, column=2) - 60 * t / t60) * even_energy
        tail = tail + decay * diffuse(band(white[k], low, high), hz)
    tail = tail * np.clip(t / 0.0021, 0, 1) ** 2
    return signal.fftconvolve(x.mean(axis=0, keepdims=True), tail, axes=1)[:, :N]


def hum(patchy_db, steady_hz, waver_db):
    """Broad appliance noise, with a mains tone and rough drones where motor and room resonate."""
    white, air = rng.standard_normal((2, 2, N)), 0
    gust = drift(1.6)   # the treble swells and sinks as a whole
    for k, low, high, hz in bands(EDGES_HZ):
        patches = patchy_db * min(1, steady_hz / hz) * drift(9.2)   # steadier above steady_hz
        level_db = at_hz(AIR_SPECTRUM, hz) + patches + 2.1 * gust * (hz > 2500)
        air = air + invert_db(level_db) * diffuse(band(white[k], low, high), hz)
    out = invert_db(AIR_DB) * rms_one(air)
    for hz, width, level_db in DRONES:
        tone = rms_one(band(rng.standard_normal((2, N)), hz - width / 2, hz + width / 2))
        out += invert_db(level_db + waver_db * drift(2.3)) * diffuse(tone, hz)
    mains = np.sqrt(2) * np.sin(2 * np.pi * MAINS_HZ * np.arange(N) / SR)
    out += invert_db(MAINS_DB + waver_db * drift(4.1)) * mains
    return out * invert_db(in_time(SWELL, column=1, outside=0))


def hoots():
    """Short sines that swell and fade, alike at both microphones."""
    out = np.zeros(N)
    for s, length, hz, db in HOOTS:
        t = np.arange(round(length * SR)) / SR
        i = round(s * SR)
        out[i:i + len(t)] += invert_db(db) * np.sin(np.pi * t / length) * np.sin(2 * np.pi * hz * t)
    return out


def scene():
    """Mash, pan and shaft close to the microphones, ringing in the kitchen over the hum."""
    squelch = grains(mash_level(column=1), 400, 1320, 4400, cycles=14.0, spread_db=2.0)
    crackle = grains(mash_level(column=2), 800, 5500, 18000, cycles=0.46, spread_db=0.5)
    bursts = pops(cycles=24, rise_s=0.0004, splash_s=0.0065, spread=1.3) + smacks()
    mash = squelch + crackle + bursts + suction()
    knocks = pan(1.5, boom_hz=170, thud_hz=370, clank_hz=1000, lean_hz=1370, sharp_hz=3000) + shaft()
    cracks = crack(0.0011, 0.0076, 0.099, jangle_db=-19.0, room_db=-1.5, build_s=0.0019, alike=.85)
    near = signal.sosfilt(signal.butter(2, 55, "high", fs=SR, output="sos"), [mash, knocks])
    # the body of each knock fills the room
    dull = signal.sosfilt(signal.butter(2, 1300, fs=SR, output="sos"), near[1])
    background = hum(patchy_db=3.0, steady_hz=700, waver_db=2.0) + hoots()
    return near.sum(axis=0) + cracks + kitchen(near[0] + dull) + background


def band_limit(x):
    """A steep low-pass at the top of the band."""
    return signal.sosfilt(signal.butter(12, 17080, fs=SR, output="sos"), x)


def record(dry):
    """An edit leaves a short silence and a quick fade-in; a steep low-pass cuts the very top."""
    t = np.arange(N) / SR
    gate = np.where(t < EDIT_OUT_S, 1, np.clip((t - EDIT_IN_S) / FADE_IN_S, 0, 1))
    top_cut = signal.cheby2(12, 18, 16000, fs=SR, output="sos")   # 18 dB down from 16 kHz
    mix = signal.sosfilt(top_cut, dry * gate)
    return band_limit(mix)


dry = scene()
out = record(dry)
wav_record(out)
```